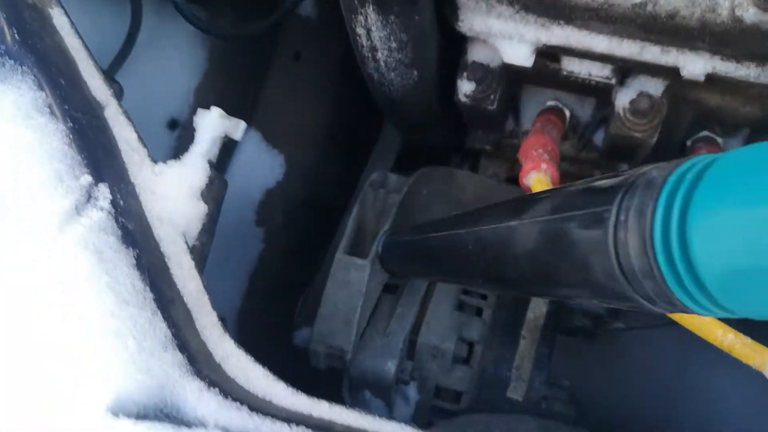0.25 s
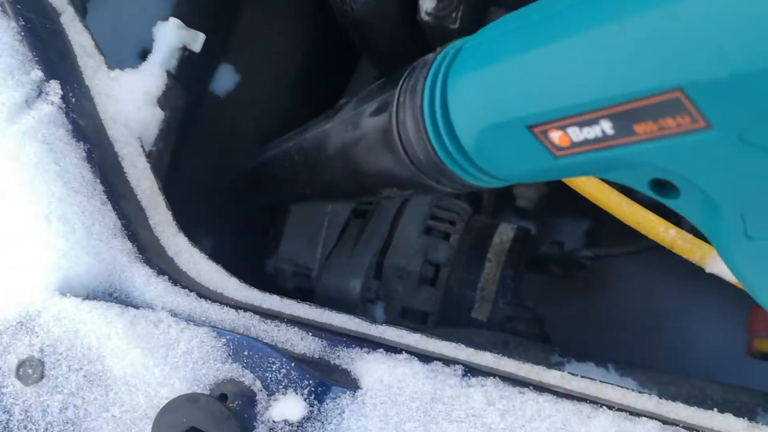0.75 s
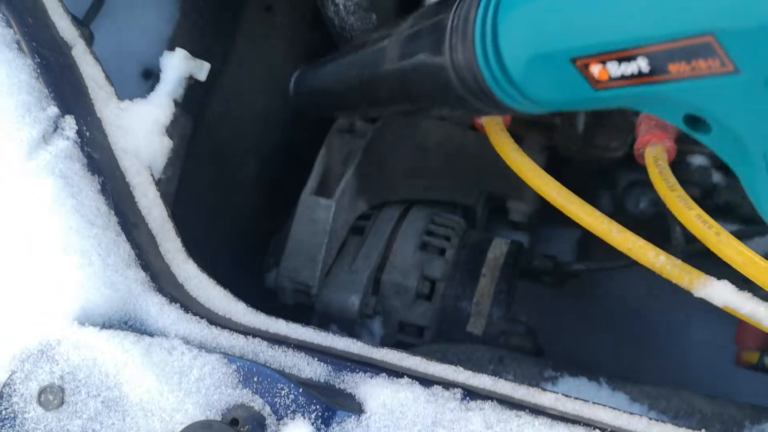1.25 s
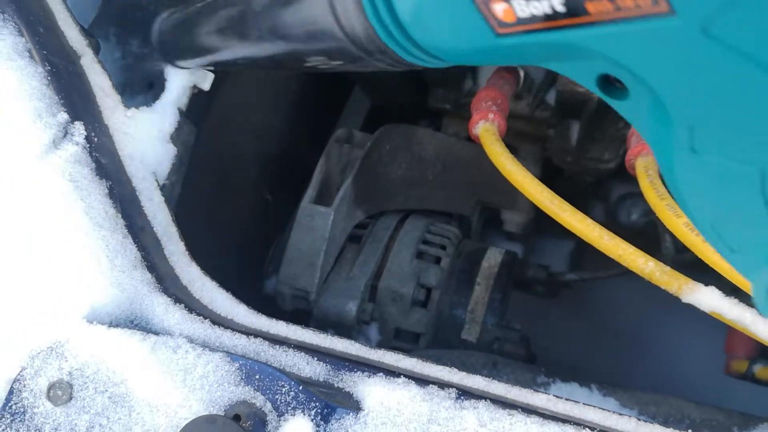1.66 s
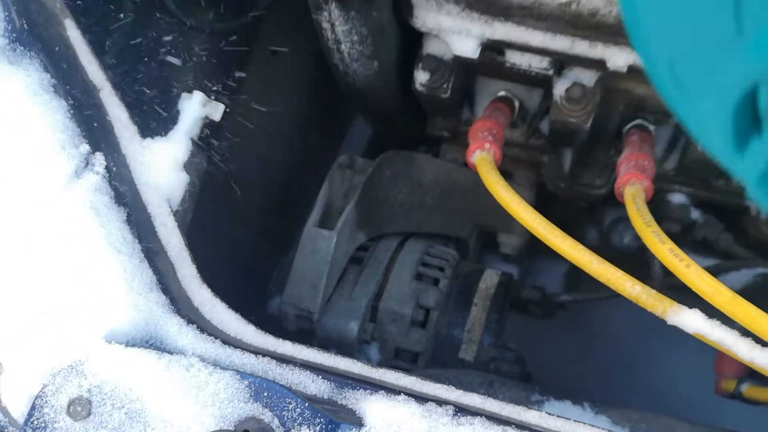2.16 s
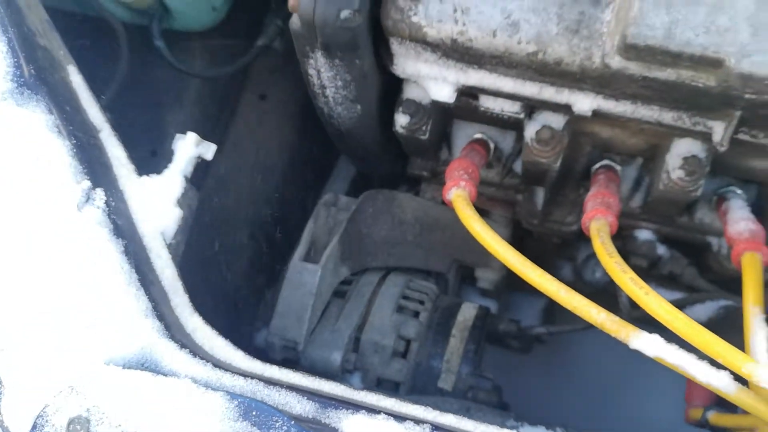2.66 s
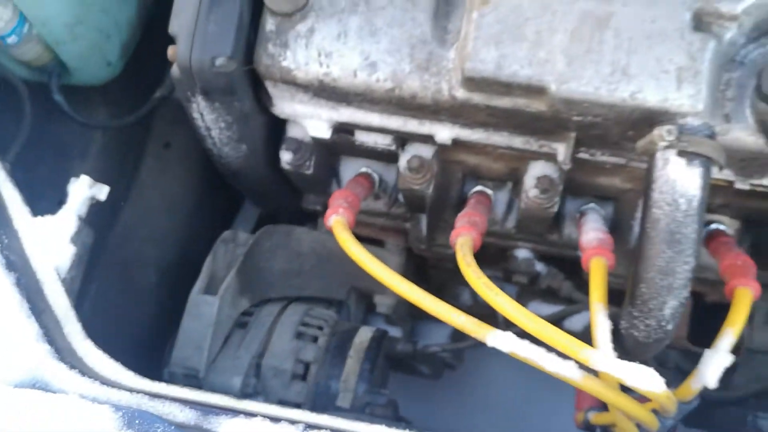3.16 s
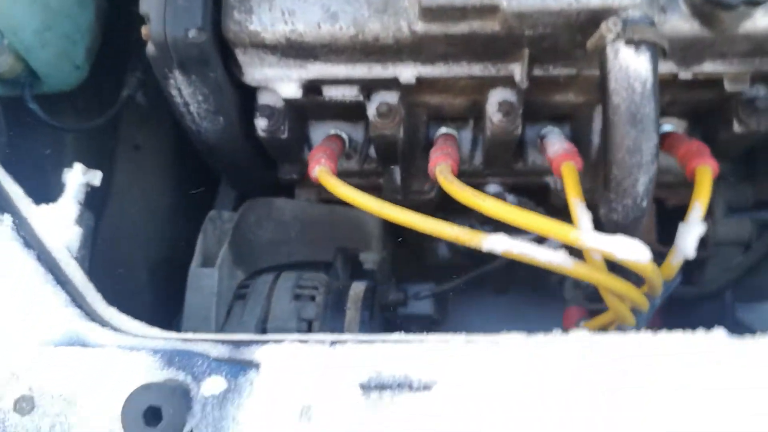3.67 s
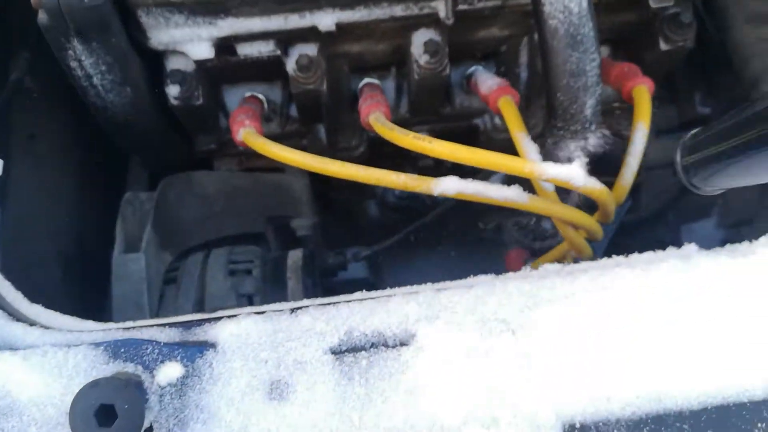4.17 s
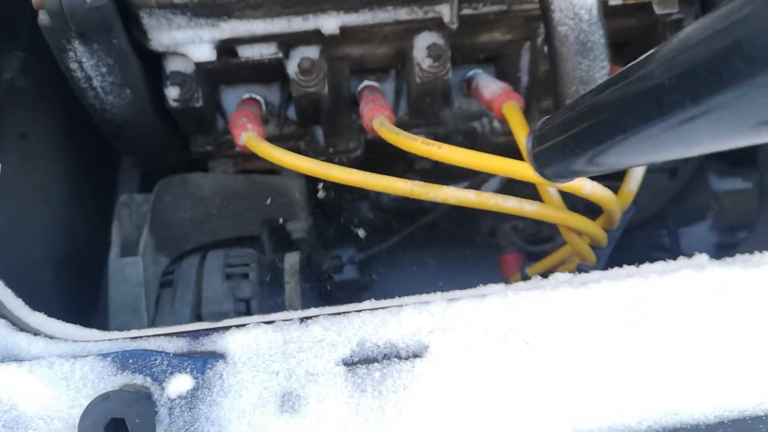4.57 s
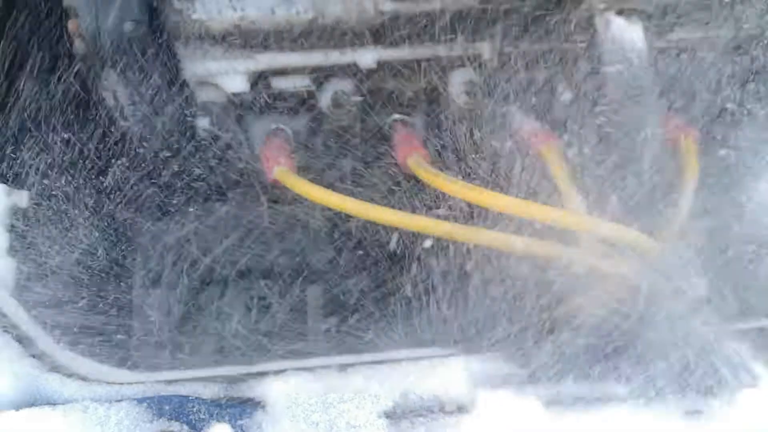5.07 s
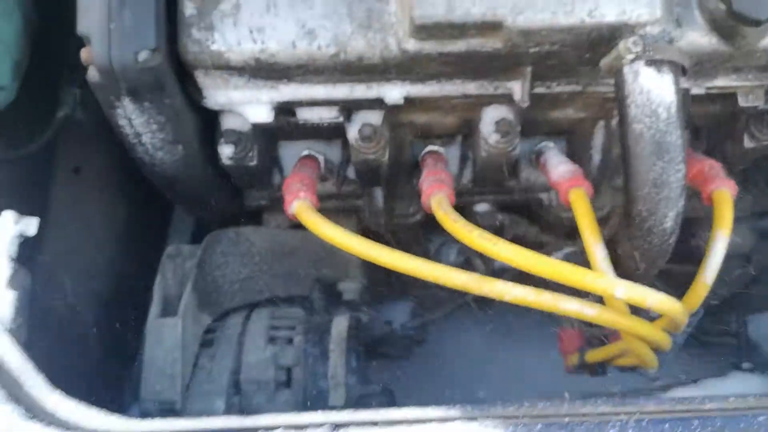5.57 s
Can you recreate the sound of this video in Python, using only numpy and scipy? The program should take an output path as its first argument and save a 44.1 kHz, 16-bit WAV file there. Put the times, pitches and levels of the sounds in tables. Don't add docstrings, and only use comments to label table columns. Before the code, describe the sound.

A small electric fan blower screams steadily, with a low hum, a piercing blade tone and dense bright air hiss coloured by nearby metal. It begins blowing across a hollow, wanders around the engine, then bites into loose snow shortly before five seconds. The motor is let go and coasts downward, still spinning at the end. Close stereo microphone, open air, no room reverberation.

```python
import sys
import numpy as np
from scipy import signal
from scipy.fft import rfft, irfft, next_fast_len
from scipy.io import wavfile

SR = 44100
rng = np.random.default_rng(int(sys.argv[2]) if len(sys.argv) > 2 else 0)


def store_pcm(level_fs):
    pcm = np.round(np.clip(level_fs, -1, 1) * 32767).astype(np.int16)
    wavfile.write(sys.argv[1], SR, np.atleast_2d(pcm).T)


def attenuation_scalar(level_db):
    decades = np.asarray(level_db, float) / 20
    return 10 ** decades


N = 257544
SIZE = next_fast_len(N)
T_S = np.arange(N) / SR
HZ = np.maximum(np.fft.rfftfreq(SIZE, 1 / SR), 1)
EARS = np.array([[.5], [-.5]])
LEFT_LAG_S = 23 / SR
BLADES = 9
RELEASE_S, LET_GO_S, DRAG_PER_S = 4.947, .07, .8015
COAST_FLOOR_DB = -38
GUST_FALL_DB_PER_S, GUST_RISE_DB = 180, 34
SPRAY_FALL_DB_PER_S, SPRAY_RISE_DB, SPRAY_PAN_DB = 81, 7, -2.5
SHADE_S, SHADE_RAMP_S, SHADE_DB = 5.58, .06, -7.0
PASS_WIDTH_HZ = 360
CUT_HZ = 15140

# multiple of turn rate, left level/dB, right level/dB
ROTOR_ORDERS = [(2, -44, -39), (3, -46, -40), (4, -47, -41), (8, -42, -39), (15, -45, -43), (18, -40, -37),
                (27, -46, -42)]
# t/s, turn rate/Hz
DRIVEN_SPEED = [(0, 277.5), (.45, 277.7), (.9, 277.2), (1.6, 277), (2.3, 277.2), (2.95, 276.4),
                (3.35, 276.7), (3.8, 276.2), (4.25, 276.9), (4.95, 276.4)]
# t/s, left level/dB, right level/dB
BLADE_BEAM = [(0, -31, -28), (.45, -28, -22), (.6, -27, -26), (1.1, -31, -22), (1.6, -28, -20),
              (1.95, -30, -30), (2.2, -34, -20), (2.5, -42, -24), (2.8, -35, -25), (3.4, -40, -28),
              (3.8, -25, -24), (4.0, -25, -31), (4.4, -23.5, -25), (4.95, -22, -26)]
# f/Hz, width/Hz, left level/dB, right level/dB
COAST_MODES = [(2455, 55, -20, -34), (2350, 50, -19, -21), (2155, 55, -23, -21), (2085, 65, -24, -22),
               (1945, 80, -18.5, -26), (1875, 75, -19, -15.5), (1800, 55, -40, -27), (1675, 65, -25, -28),
               (1615, 50, -32, -16.3), (1588, 30, -27, -27)]
# t/s, bearing toward left port, nearness, nozzle tilt
TOOL_POSE = [(0.0, 0.64, 1.3, -2.2), (.3, 0.26, -0.65, -0.54), (.6, -0.54, -0.74, 0.88),
             (1.0, -1.3, -1.45, 1), (1.65, -0.31, 0.3, -0.71), (2.2, -0.71, 1.06, -1),
             (2.5, -0.62, 1.5, 0.075), (2.85, 0.21, 0.28, -0.056), (3.15, -0.029, .7, 0.85),
             (3.4, -0.13, 1.9, 0.97), (3.6, -0.18, 1.7, 0.017), (3.85, 1.14, -0.2, 0.19),
             (4.1, 1.7, 0.28, 0.16), (4.45, 1.95, -0.029, -0.66), (4.95, 2.12, 0.29, -1.43),
             (5.55, 1.5, -0.93, -.7), (5.65, 1.1, 0.47, -1.1), (5.84, 0.94, -0.91, -1.2)]
# level/dB, dB per bearing, dB per nearness, dB per tilt, power of speed
PART_LEVELS = [
    (-41, -0.5, 1.7, 2, -1.1),
    (-26.5, 0, 1.44, -.3, 1.27),
    (-22.5, 0.04, 0.9, 0.44, 1.5),
    (-20.5, 2.0, -1.05, 2.34, 1.6),
    (-22, .5, 0.54, -0.24, 2.0),
    (-25, 2.05, 1.45, 3.7, 2),
    (-35.5, 1.0, 1.4, 0.8, 1.5),
    (-30.5, 1.0, 0.66, 0.1, 6),
]
# L-R/dB, dB per bearing, dB per nearness, dB per tilt
PART_PANS = [
    (3, 2.5, -1.2, 1),
    (-5.5, 8, -0.3, 4.6),
    (-2.5, 3, -0.7, 2),
    (-1.5, 1.9, -1, 3),
    (4, 0.7, -1.5, -1.4),
]
# f/Hz, L-R/dB, likeness 0-1, left trail beyond travel time/rad
PORTS = [(30, 0, 1, -.1), (60, 0, 1, -0.22), (130, -1, 1, -.27), (307, 0, 1, 0.52), (504, -5.5, 0.87, 0.9),
         (716, -7, 1, 0.42), (890, -7, 0.9, -0.37), (1300, 0, 0.48, -0.21), (1690, -4.5, 0.84, -0.21),
         (2550, -2.5, 1, 0.34), (3250, 4.5, 0.77, 0.35), (4530, -5, 0.57, 0.34), (5650, 1, 0, 0.27),
         (7660, -1.5, 0.61, -1.37), (10800, 0, 0.26, -0.2)]
# f/Hz, density/dB
BUFFET_COLOUR = [(15, -22), (30, 0.5), (50, -6), (90, -5.5), (130, -4.5), (180, -5), (240, -4), (280, -18)]
# f/Hz, density/dB
ROAR_COLOUR = [(190, -9), (240, -7), (330, -3.5), (450, -2), (560, 0), (700, 0), (850, -3), (1000, 1),
               (1200, -0.5), (1420, -1), (1550, -14)]
# f/Hz, density/dB
SPLASH_COLOUR = [(1400, -18.5), (1520, -2.5), (1620, 0.5), (1750, -1), (1870, 0), (2070, 2.5), (2170, -1),
                 (2330, -2), (2410, -0.5), (2500, -8)]
# f/Hz, density/dB
GUST_COLOUR = [(15, -10), (30, 12), (60, 10), (110, -27), (200, 4), (300, 12.5), (380, 8), (450, -27)]
# f/Hz, density/dB
DUCT_COLOUR = [(2250, 2), (2400, -5.5), (2500, 4.5), (2750, 6), (2880, 1), (3000, -10), (3200, -62)]
# f/Hz, density/dB
RUSH_COLOUR = [(2850, -20), (3050, 0), (3300, -2.5), (3800, -2), (4100, -4.5), (4550, -.5), (4850, -3),
               (5100, -4.5), (5720, -1.5), (6200, -5), (6600, -5.5), (6800, -7), (7000, -14), (7200, -30)]
# f/Hz, density/dB
HISS_COLOUR = [(6500, -25), (6750, -12), (6950, -5.5), (7450, -.3), (7650, -1.3), (7950, 0), (8150, -5),
               (8550, -6.5), (8720, -5), (8900, -9.5), (9050, -14), (9250, -30)]
# f/Hz, density/dB
AIR_COLOUR = [(8750, -4), (8950, 4), (9150, -.7), (9350, 4), (9700, -3), (10500, -5.5), (12000, -10),
              (13500, -11), (14500, -14), (16000, -22), (16500, -40)]
# f/Hz, density/dB
SPRAY_COLOUR = [(1900, -22), (2300, 16), (3400, -1), (4200, 1.5), (5700, -3), (6300, -12), (8000, -15),
                (10000, -33)]
# start/s, rise/s, end/s, level/dB
GUST_EVENTS = [
    (-.2, 0.32, .4, -44),
    (4.95, 0.1, 6.2, -36),
]
# start/s, rise/s, end/s, level/dB
SPRAY_EVENTS = [
    (4.7, 0.33, 5.45, -20.5),
]
# t/s, left level/dB, right level/dB
HOLLOW_LEVEL = [(0, -21.5, -21), (.1, -17, -22), (.22, -19, -22), (.35, -16, -19), (.45, -21, -14),
                (.55, -25, -20), (.64, -28, -26.5), (.72, -49, -43), (.8, -79, -70)]
# f/Hz, width/Hz, level/dB
HOLLOW_MODES = [
    [(1270, 270, -10), (1440, 78, -10), (1660, 220, -9)],
    [(1368, 91, 19), (1470, 100, -12), (1640, 76, -18)],
]
# f/Hz, width/Hz
BAY_MODES = [(1570, 380), (4570, 360), (5700, 480)]
# level/dB, dB per bearing, dB per nearness, dB per tilt
BAY_SWELL = [
    (-1, -3.5, 1.7, 1.6),
    (1, 0, 1.5, -1.3),
    (-1, 0.8, 3.8, 2.2),
    (-3, -0.5, -1.3, -1.2),
    (0.5, -2, -0.4, 0.2),
    (0, 2.3, 1.6, 4.5),
]
# f/Hz, echo over direct
ECHO_SHARE = [(300, 0), (1200, .15), (2500, .1), (4000, .22), (9000, .32)]
# f/Hz, swing/dB
FLUTTER = [(40, 3), (300, 1), (1500, 0.36), (4000, 1.03), (9000, 0.9)]
# middle t/s, length/s, f/Hz, left gain/dB, right gain/dB
BAY_PASSES = [(.8, 2.1, 6600, 5, 3.5), (1.1, .6, 5460, -4, -1.5), (1.2, 0.35, 2870, 3, -3),
              (1.998, 0.43, 4440, 4, 4), (2.195, 0.25, 5800, 5, 6), (2.498, 0.28, 1600, -17, -1.5),
              (2.5, 0.27, 2740, 3, 6), (2.797, 0.36, 1560, 3.5, 4), (3.0, .8, 5160, 7.5, 1),
              (3.6, 0.76, 6500, 1, 9.5), (4.3, 0.47, 4450, 5, 4), (4.5, 0.54, 6060, -2, -7),
              (5.0, 0.53, 5800, 1.5, 9.0), (5.098, 1.5, 800, 4, 3.5), (.1, .25, 2770, 8, 5.5),
              (1.6, 3.7, 7820, -1.5, 2), (2.0, .5, 8600, 4, 0), (1.55, 0.58, 2090, 2.5, 3),
              (5.0, 0.68, 1600, 6.5, -3), (5.0, 0.89, 8600, 6, 3.5), (1.0, 1.8, 4230, 0, -2.5)]


def rms_one(x):
    return x / np.sqrt(np.mean(x ** 2) + 1e-20)


def in_time(rows):
    s, *columns = np.transpose(rows)
    return [np.interp(T_S, s, c) for c in columns]


def at_hz(points, hz, axis=1):
    points = np.array(points)
    return np.interp(np.log(hz), np.log(points[:, 0]), points[:, axis])


def bell(x, centre, width):
    return np.exp(-.5 * (2 * (x - centre) / width) ** 2)


def resonance_power(hz, centre_hz, width_hz):
    return 1 / (1 + (2 * (hz - centre_hz) / width_hz) ** 2) ** 2


def drift(rate_hz):
    r = np.exp(-128 * np.pi * rate_hz / SR)
    noise = rng.standard_normal((2, N // 64 + 1502))
    slow = signal.lfilter([1], [1, -2 * r, r * r], noise)[:, 1500:]
    return np.array([np.interp(np.arange(N) / 64, np.arange(len(v)), rms_one(v)) for v in slow])


def patches(shape, tall, long):
    up = np.fft.fftfreq(shape[1])[:, None] * tall
    along = np.fft.fftfreq(shape[2]) * long
    smooth = np.exp(-2 * np.pi ** 2 * (up ** 2 + along ** 2))
    white = rng.standard_normal(shape) + 1j * rng.standard_normal(shape)
    field = np.fft.ifft2(white * smooth)
    return field / np.sqrt(np.mean(np.abs(field) ** 2))


def left_trail(hz):
    return 2 * np.pi * hz * LEFT_LAG_S + at_hz(PORTS, hz, axis=3)


def port_noise():
    shared, other = rng.standard_normal((2, len(HZ))) + 1j * rng.standard_normal((2, len(HZ)))
    alike = np.clip(at_hz(PORTS, HZ, axis=2), 0, 1)
    left = alike * shared + np.sqrt(1 - alike ** 2) * other
    delay = np.array([np.exp(-1j * left_trail(HZ)), np.ones(len(HZ))])
    return np.array([left, shared]) * delay * attenuation_scalar(EARS * at_hz(PORTS, HZ))


def turbulence(colour):
    inside = (HZ > colour[0][0]) * (HZ < colour[-1][0])
    shaped = port_noise() * attenuation_scalar(at_hz(colour, HZ)) * inside
    return rms_one(irfft(shaped, SIZE)[:, :N])


def speed():
    since = np.maximum(T_S - RELEASE_S, 0)
    undriven_s = since - LET_GO_S * (1 - np.exp(-since / LET_GO_S))
    return in_time(DRIVEN_SPEED)[0] / (1 + DRAG_PER_S * undriven_s)


def posed(rows):
    speed_db = 20 * np.log10(speed() / DRIVEN_SPEED[-1][1])
    controls = [np.ones(N), *in_time(TOOL_POSE), speed_db]
    return np.array(rows) @ np.array(controls[:len(rows[0])])


def swell_db(events, rise_db, fall_db_per_s):
    levels = []
    for start, rise, end, db in events:
        yet_to_rise_db = rise_db * np.maximum(1 - (T_S - start) / rise, 0)
        fallen_db = fall_db_per_s * np.maximum(T_S - end, 0)
        levels.append(db - yet_to_rise_db - fallen_db)
    return np.max(levels, axis=0)


def blade_db(turns_hz):
    driven_db = np.array(in_time(BLADE_BEAM))
    power = attenuation_scalar(2 * COAST_FLOOR_DB)
    for hz, width, left_db, right_db in COAST_MODES:
        peak = attenuation_scalar(2 * np.array([[left_db], [right_db]]))
        power = power + peak * resonance_power(BLADES * turns_hz, hz, width)
    coasting = np.clip((T_S - RELEASE_S) / LET_GO_S * 2, 0, 1)
    return (1 - coasting) * driven_db + coasting * 10 * np.log10(power)


def rotor():
    turns_hz = speed()
    hum_db = posed(PART_LEVELS[7:])
    turn = 2 * np.pi * np.cumsum(turns_hz * (1 + .00025 * drift(10)[0])) / SR
    load_db = 70 * np.log10(turns_hz / turns_hz[0])

    def tone(multiple, level_db, waver_db):
        trail = np.repeat(left_trail(multiple * turns_hz[::8]), 8)[:N] * [[1], [0]]
        wave = np.sin(multiple * (turn + multiple) - trail)
        return np.sqrt(2) * attenuation_scalar(level_db + waver_db * drift(11.0)) * wave

    total = tone(1, hum_db - .8 * EARS, waver_db=1.5)
    total = total + tone(BLADES, blade_db(turns_hz) + 1, waver_db=1.2)
    for multiple, left_db, right_db in ROTOR_ORDERS:
        total = total + tone(multiple, np.array([[left_db], [right_db]]) + load_db, waver_db=3.5)
    return total


def jet():
    buffet_db, roar_db, splash_db = posed(PART_LEVELS[:3])
    splash_pan_db = posed(PART_PANS[:1])
    buffet = attenuation_scalar(buffet_db) * turbulence(BUFFET_COLOUR)
    roar = attenuation_scalar(roar_db) * turbulence(ROAR_COLOUR)
    splash = attenuation_scalar(splash_db + EARS * splash_pan_db) * turbulence(SPLASH_COLOUR)
    gust_db = swell_db(GUST_EVENTS, GUST_RISE_DB, GUST_FALL_DB_PER_S)
    gust = attenuation_scalar(gust_db) * turbulence(GUST_COLOUR)
    return buffet + roar + splash + gust


def housing():
    duct_db, rush_db = posed(PART_LEVELS[3:5])
    duct_pan_db, rush_pan_db = posed(PART_PANS[1:3])
    duct = attenuation_scalar(duct_db + EARS * duct_pan_db) * turbulence(DUCT_COLOUR)
    rush = attenuation_scalar(rush_db + EARS * rush_pan_db) * turbulence(RUSH_COLOUR)
    return duct + rush


def nozzle():
    hiss_db, air_db = posed(PART_LEVELS[5:7])
    hiss_pan_db, air_pan_db = posed(PART_PANS[3:5])
    hiss = attenuation_scalar(hiss_db + EARS * hiss_pan_db) * turbulence(HISS_COLOUR)
    air = attenuation_scalar(air_db + EARS * air_pan_db) * turbulence(AIR_COLOUR)
    return hiss + air


def hollow():
    power = [sum(attenuation_scalar(2 * db) * resonance_power(HZ, hz, width) for hz, width, db in modes)
             for modes in HOLLOW_MODES]
    hoot = irfft(port_noise() * np.sqrt(power), SIZE)[:, :N]
    return attenuation_scalar(np.array(in_time(HOLLOW_LEVEL))) * np.array([rms_one(v) for v in hoot])


def passes_db(hz, s):
    total = 0
    for middle, length, centre_hz, *db in BAY_PASSES:
        bump = np.outer(bell(hz, centre_hz, PASS_WIDTH_HZ), bell(s, middle, length))
        total = total + np.reshape(db, (2, 1, 1)) * bump
    return total


def engine_bay(x):
    hz, s, cells = signal.stft(x, SR, nperseg=1024, noverlap=768)
    step_hz, step_s = hz[1], s[1] - s[0]
    echo = patches(cells.shape, 150 / step_hz, .25 / step_s) * at_hz(ECHO_SHARE, hz + 1)[:, None]
    gusts = patches(cells.shape, 720.0 / step_hz, 0.017 / step_s)
    flutter_db = (gusts.real + gusts.imag[:1]) * at_hz(FLUTTER, hz + 1)[:, None]
    frame_at = np.minimum((s * SR).astype(int), N - 1)
    bay_db = np.reshape(posed(BAY_SWELL)[:, frame_at], (len(BAY_MODES), 2, 1, -1))
    modes_db = sum(db * bell(hz, mode_hz, width)[:, None] for db, (mode_hz, width) in zip(bay_db, BAY_MODES))
    gain = attenuation_scalar(flutter_db + passes_db(hz, s) + modes_db)
    return signal.istft(cells * gain * (1 + echo), SR, nperseg=1024, noverlap=768)[1][:, :N]


def snow():
    level_db = swell_db(SPRAY_EVENTS, SPRAY_RISE_DB, SPRAY_FALL_DB_PER_S)
    return attenuation_scalar(level_db + EARS * SPRAY_PAN_DB) * turbulence(SPRAY_COLOUR)


def shade():
    hidden = np.clip((T_S - SHADE_S) / SHADE_RAMP_S, 0, 1)
    return attenuation_scalar(SHADE_DB * hidden * [[1], [0]])


def scene():
    bright_air = shade() * (housing() + nozzle() + snow())
    return rotor() + engine_bay(jet() + bright_air) + hollow()


def band_limit(x):
    return signal.sosfilt(signal.butter(12, 15360, fs=SR, output="sos"), x)


def record(dry):
    held = 1.25 * np.tanh(dry / 1.25)
    cut = irfft(rfft(held, SIZE) * (HZ < CUT_HZ), SIZE)[:, :N]
    return band_limit(cut)


dry = scene()
out = record(dry)
store_pcm(out)
```